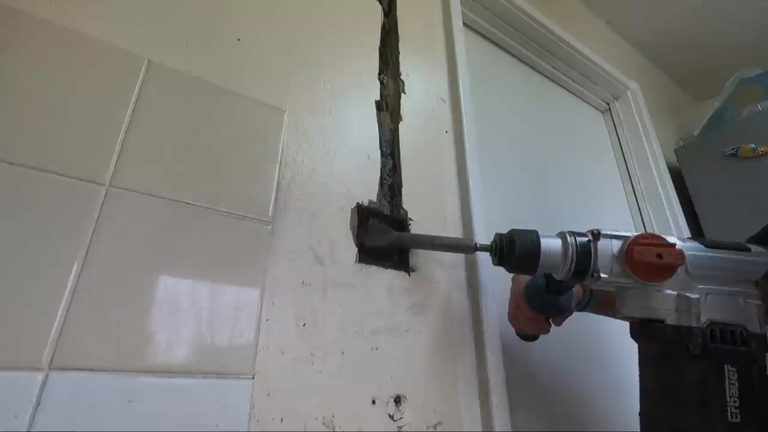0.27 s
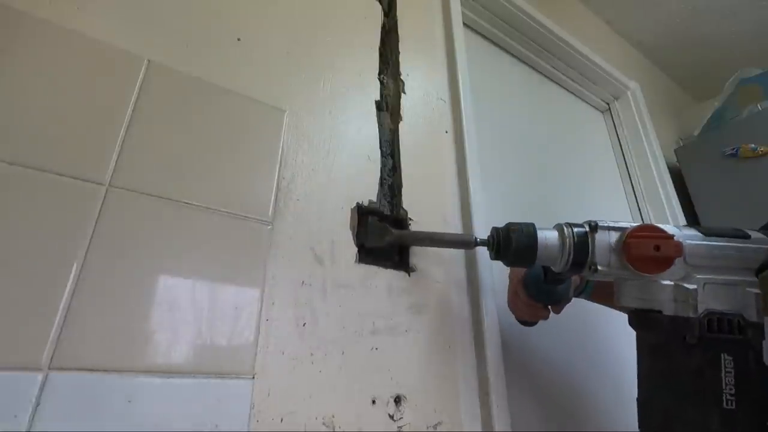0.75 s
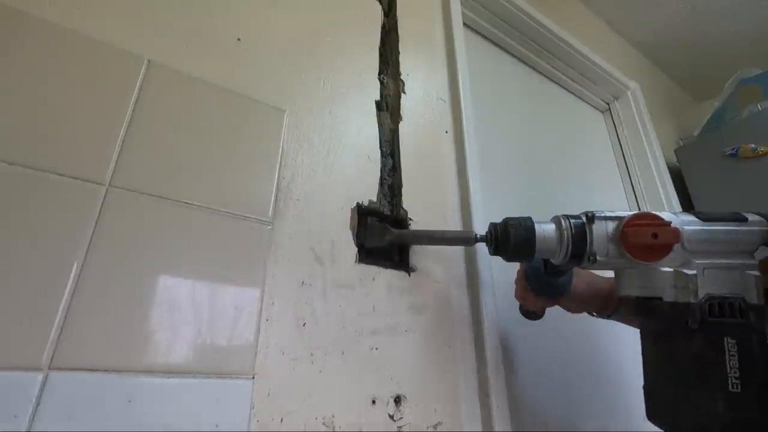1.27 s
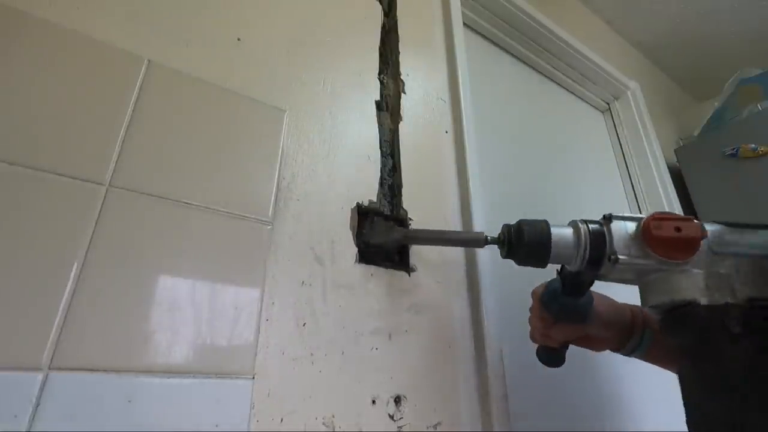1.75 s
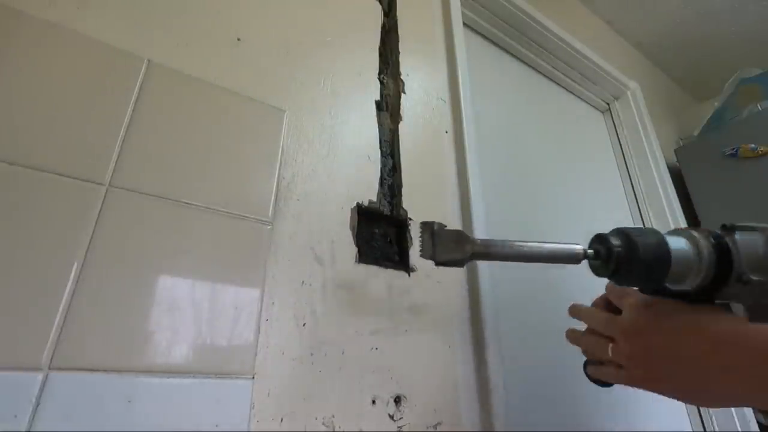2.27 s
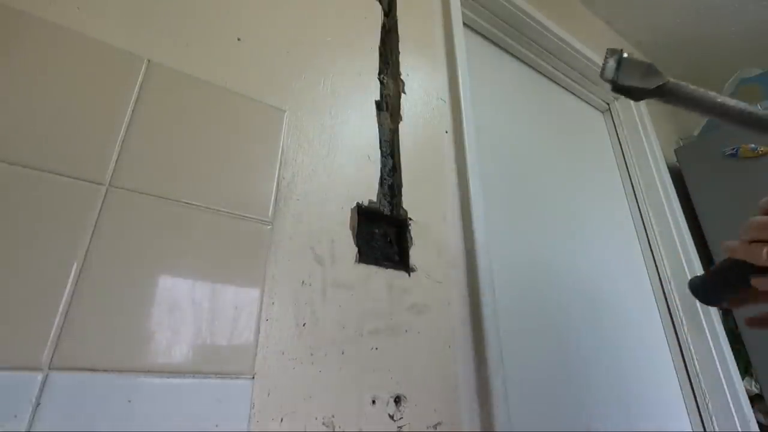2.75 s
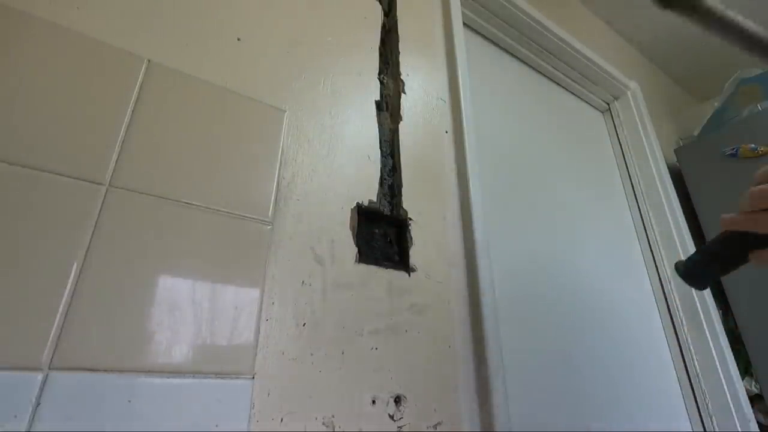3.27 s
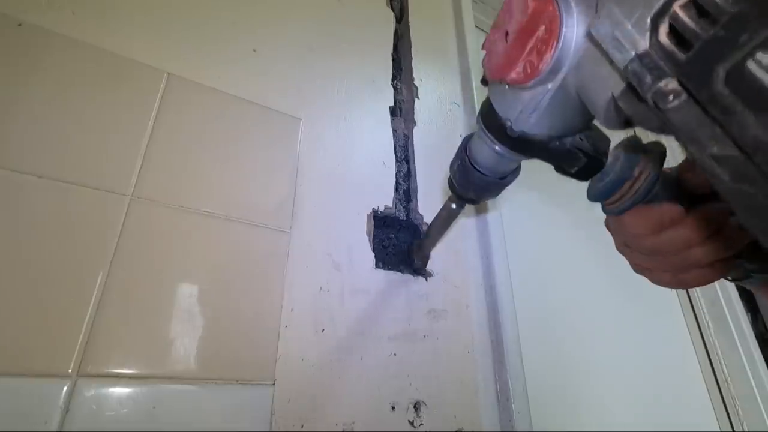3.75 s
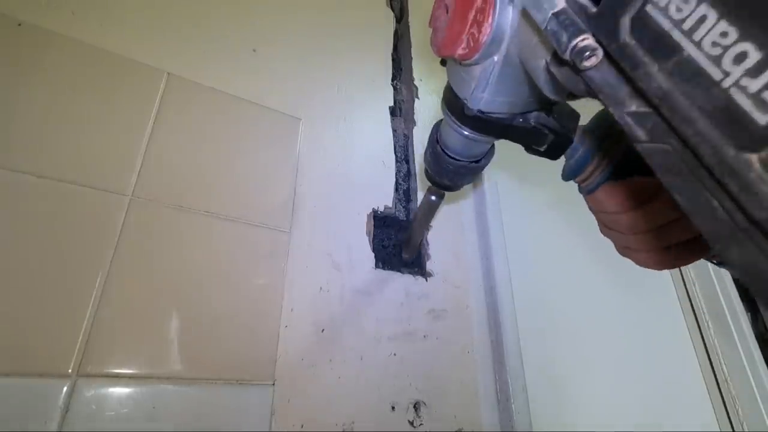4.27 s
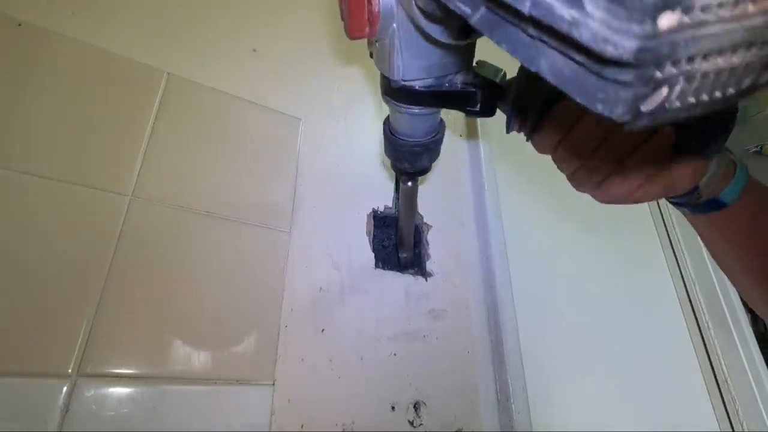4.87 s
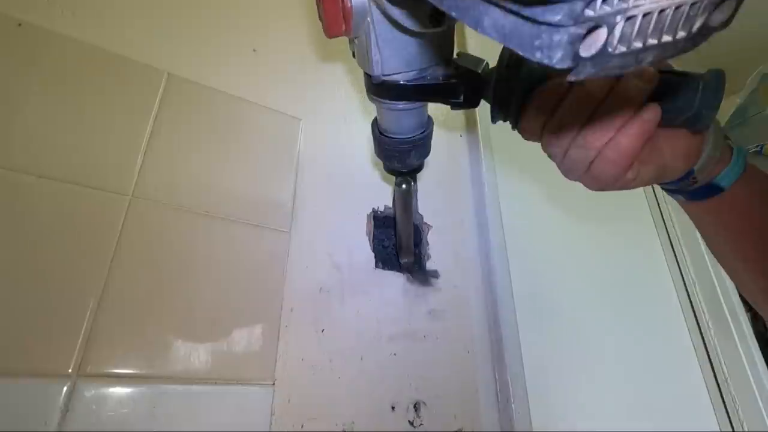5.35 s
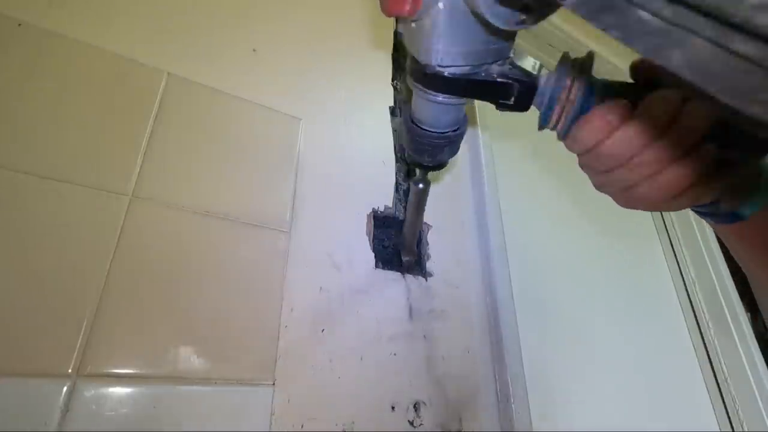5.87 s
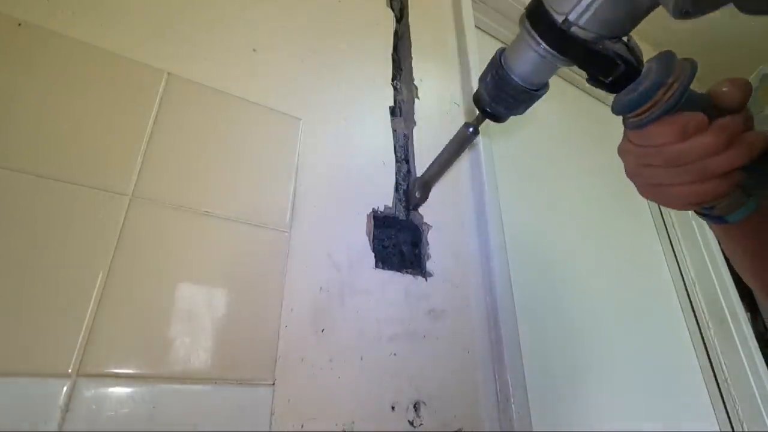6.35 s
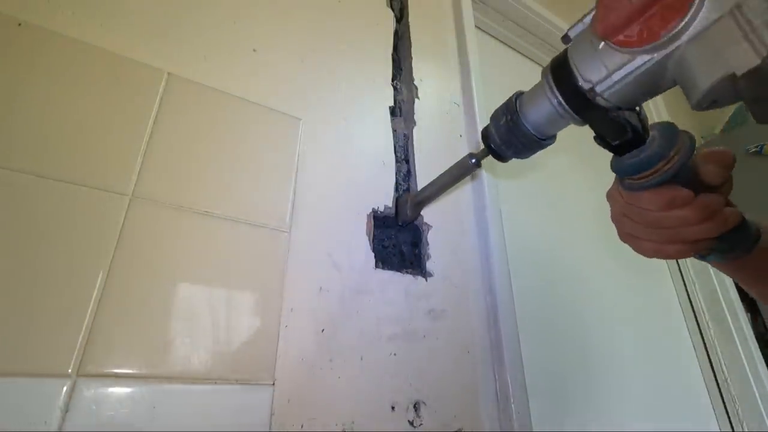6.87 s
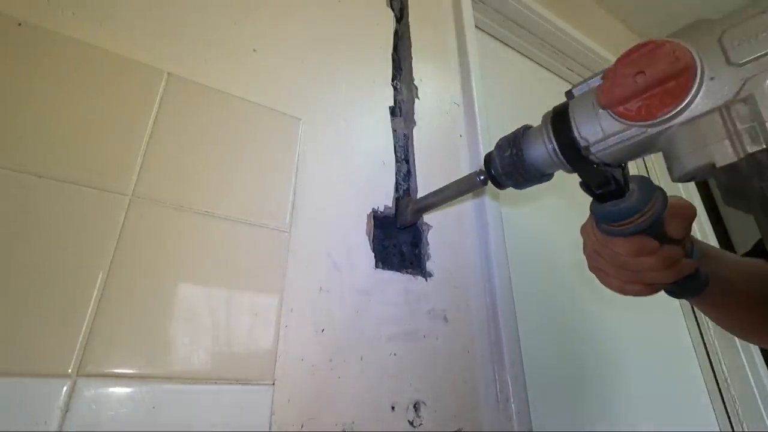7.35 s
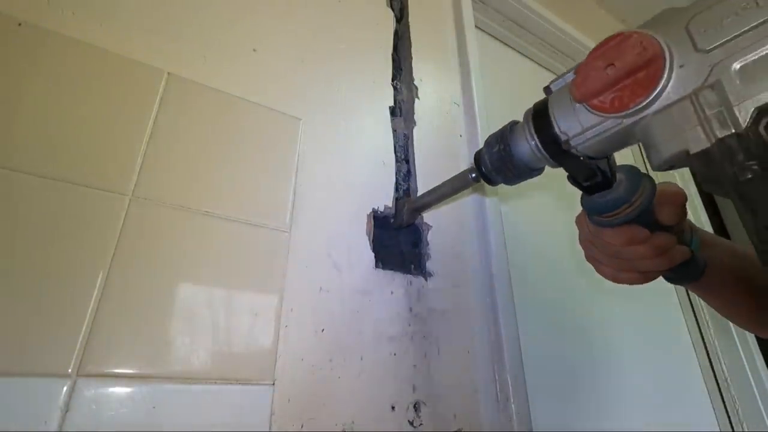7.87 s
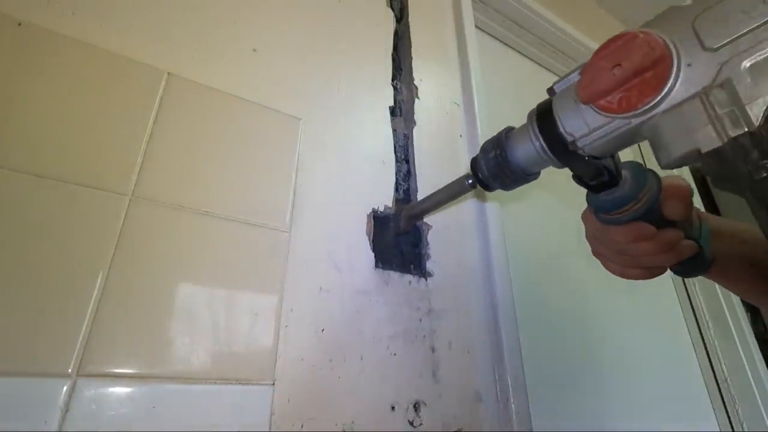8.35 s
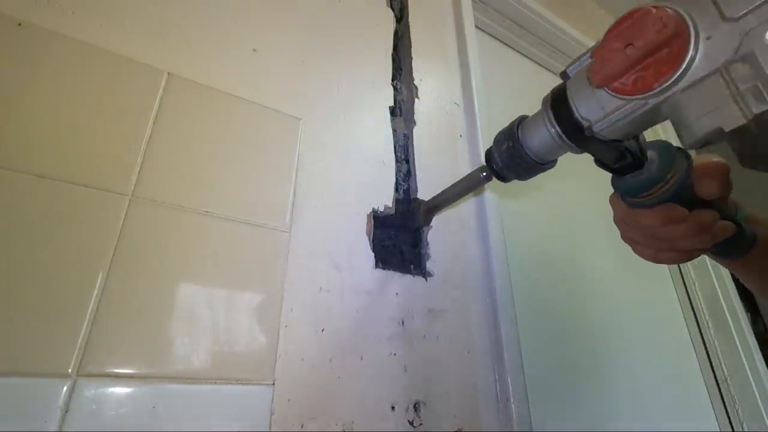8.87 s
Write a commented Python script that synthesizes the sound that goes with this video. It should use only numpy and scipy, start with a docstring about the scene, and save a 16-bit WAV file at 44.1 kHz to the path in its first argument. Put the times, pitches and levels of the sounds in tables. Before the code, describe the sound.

In a small tiled room, a hammer drill whirs at speed and chatters briefly against plaster, then winds down in a long falling whine. Clicks and dull bumps follow as the chisel is set again. More short bursts pound the wall with booming thuds, sharp cracks and steel ringing, each followed by a gritty coasting motor. The microphone is close, with short hard reflections.

```python
"""Hammer drill on a plaster wall

A hammer drill chisels a socket box out of a plaster wall in a small tiled room. Short trigger pulls whirl
the motor up: filtered noise makes its rush, rotor-locked sines its whine, and both fall as it coasts down.
Blows timed by the crank set off wall booms, plaster cracks and chisel rings. Between bursts the tool clicks,
bumps and rumbles as the chisel is set against the wall anew."""
import sys
import numpy as np
from scipy import signal
from scipy.fft import rfft, irfft, next_fast_len
from scipy.io import wavfile
from scipy.ndimage import uniform_filter1d

SR = 44100
rng = np.random.default_rng(int(sys.argv[2]) if len(sys.argv) > 2 else 0)


def write(x):
    x = np.atleast_2d(x).T
    wavfile.write(sys.argv[1], SR, np.round(np.clip(x, -1, 1) * 32767).astype(np.int16))


N = 401310
TIME = np.arange(N) / SR
FAN_CYCLES_PER_BLOW, FULL_SPEED_HZ = 52.5, 3240   # speed is given as the pitch of the fan tone

# bursts of blows, the chisel biting, or the idle piston knocking lightly in the weak rows at 0.2 s and 1 s:
# (first blow [s], end [s], thud at full speed [dB], crack [dB], chisel ring [dB], wall clack re thud [dB])
BLOW_BURSTS = [(0.014, 0.149, -20.5, -21, -25, -25), (0.2, 0.548, -37.5, -28, -31, 10),
               (1.023, 1.557, -29, -22.5, -28, 5), (3.784, 3.871, -14, -45, -29, -10),
               (3.877, 3.945, -8, -16.5, -18, -1), (5.323, 5.546, -14, -25.5, -28.5, 3),
               (5.674, 5.74, -15, -25, -41, 14), (5.739, 5.885, -14.5, -26, -21.5, 5.5),
               (7.386, 8.13, -16, -24, -26, 10.5), (8.104, 8.36, -19, -26.5, -26, 8),
               (8.398, 8.598, -19, -24.5, -32, 10), (9.069, 9.113, -15, -17.5, -32, -10)]
# trigger pulls: (on [s], off [s], fan tone reached at off [Hz], coasting time constant [s])
TRIGGER_PULLS = [(0, .017, 2948, 1.183), (.075, .232, 3917, 1.521), (.895, 1.119, 3830, 1.47),
                 (3.764, 3.892, 2885, 1.42), (5.298, 5.43, 2969, 1.36), (5.729, 5.84, 3350, 1.451),
                 (7.339, 7.509, 3319, 1.165), (8.077, 8.256, 3350, 1.234)]


def from_db(db):
    """Decibels to gain."""
    return 10 ** (np.asarray(db) / 20)


def rms_one(x):
    """Scale to unit rms."""
    return x / np.sqrt(np.mean(x ** 2) + 1e-20)


def unit_energy(x):
    """Scale a response to unit energy."""
    return x / np.sqrt(np.sum(x ** 2) + 1e-20)


def gain_at(points, hz):
    """Gain of a (frequency [Hz], level [dB]) table at given frequencies."""
    f, db = np.transpose(points)
    return from_db(np.interp(np.log(hz + 1), np.log(f), db))


def shaped(x, gain):
    """Filter by a gain that is a function of frequency."""
    size = next_fast_len(len(x))
    hz = np.arange(size // 2 + 1) * SR / size
    return irfft(rfft(x, size) * gain(hz), size)[:len(x)]


def butter(x, hz, kind):
    """Second-order Butterworth filter."""
    return signal.sosfilt(signal.butter(2, hz, kind, fs=SR, output="sos"), x)


def drift(rate_hz, step=16):
    """Slow random signal of unit rms, computed at every step-th sample."""
    white = rng.standard_normal(next_fast_len(N // step + 2))
    hz = np.fft.rfftfreq(len(white), step / SR)
    slow = irfft(rfft(white) / (1 + (hz / rate_hz) ** 2), len(white))
    return np.interp(np.arange(N) / step, np.arange(len(slow)), rms_one(slow))


def fade(t, t60_s):
    """Exponential decay by 60 dB in t60_s."""
    return np.exp(-np.log(1000) * t / t60_s)


def swell(start_s, end_s):
    """A rounded rise and fall, 0-1."""
    return np.sin(np.pi * np.clip((TIME - start_s) / (end_s - start_s), 0, 1))


def taps(rows):
    """A click for each (time [s], level [dB]) row."""
    clicks = np.zeros(N)
    for s, db in rows:
        clicks[int(s * SR)] = from_db(db)
    return clicks


def play(clicks, response):
    """Every click sets off the response."""
    return signal.oaconvolve(clicks, response)[:N]


def motor_speed(start_hz=2900, spin_up_s=.07, friction_hz=1280):
    """Each pull whirls the motor up; then air drag and a steady friction run it down."""
    fan_hz = np.full(N, float(start_hz))
    for on, off, top_hz, coast_s in TRIGGER_PULLS:
        from_hz = np.interp(on, TIME, fan_hz)
        t = TIME[TIME >= on]
        rise = np.expm1(-(t - on) / spin_up_s) / np.expm1(-(off - on) / spin_up_s)
        driven = from_hz + (top_hz - from_hz) * rise
        coast = (top_hz + friction_hz) * np.exp(-(t - off) / coast_s) - friction_hz
        fan_hz[TIME >= on] = np.where(t < off, driven, np.maximum(coast, 0))
    return fan_hz


def torque(fan_hz, lag_s=0.026):
    """How hard the motor pulls, 0-1: it follows the acceleration with a lag."""
    r = np.exp(-1 / (lag_s * SR))
    pull = signal.lfilter([1 - r], [1, -r], np.maximum(np.gradient(fan_hz), 0) + 1e-18)
    return pull / pull.max()


def per_pull():
    """The levels of the latest pull at every sample, changing smoothly."""
    # one row per pull: (rush [dB], roar [dB], hiss [dB], starting growl [dB], fan tone [dB], overtones [dB])
    pull_levels = [(-2, -5, 1.5, -34, -38, -53), (0.5, -1, -1, -33, -40, -30),
                   (0.5, 0, -1, -35, -28.5, -28.5), (2, 4, 3, -13.5, -25.5, -27),
                   (1, 3, 0, -12.5, -43, -45), (1, 2.5, 0.5, -24, -31, -37),
                   (-1.5, -4.5, 2, -12.5, -43, -45), (-1.5, 1.5, 2.5, -29, -37, -55)]
    latest = np.maximum(np.searchsorted(np.array(TRIGGER_PULLS)[:, 0], TIME, "right") - 1, 0)
    return uniform_filter1d(np.array(pull_levels, float)[latest].T, size=600)


def by_speed(fan_hz):
    """Level, roar and hiss of the rush of fan and gears at the current speed."""
    # (fan tone [Hz], level [dB], relative roar before trim [dB], relative hiss before trim [dB])
    speed_levels = [(0, -46, -13, -7), (90, -42, -12, -15), (300, -32.5, -16, -13), (530, -25, -17.5, -9.5),
                    (900, -21.5, -12.5, -8), (1280, -20, -10, -6.5), (2190, -16, -11, -8.5),
                    (3040, -14, -9.5, -7.5), (3930, -10, -15.5, -7)]
    hz, *columns = np.transpose(speed_levels)
    return [np.interp(fan_hz, hz, c) for c in columns]


def poses():
    """Share of each way of holding the tool, over time."""
    # the tool is turned at these times [s]
    turns_s = [3.9, 6.75]
    first, second = [np.clip((TIME - s) / 0.2 + .5, 0, 1) for s in turns_s]
    return np.array([1 - first, first - second, second])


def housing(hz, pose, depth):
    """Gain of the tool's body and vents; depth scales the resonance peaks in dB."""
    # broad colour of the rush: (frequency [Hz], relative density [dB per Hz])
    rush_colour = [(30, -50), (70, -27), (140, -21), (280, -8), (420, -6.5), (650, -7), (900, -3),
                   (1500, -1), (2300, -3), (3200, 1), (4300, -5), (6800, -13.5), (8400, -24), (12000, -27)]
    # resonances at depth 1: (frequency [Hz], width [Hz], held level [dB], held close [dB], held askew [dB])
    resonances = [(650, 184, 8, 9.5, 12), (1085, 170, 4, 4, 7), (1204, 360, -2, 0, -6),
                  (1535, 39, -4, 3.5, 3.5), (1850, 68, -2, -5, -4.5), (2163, 117, 4, 7, 4),
                  (2420, 216, 3, 8.5, 3.5), (2800, 260, 1, 3, 5.5), (4030, 170, -2.5, 2, -3.5),
                  (5240, 490, 1.5, 2.5, 1)]
    peaks_db = sum(dbs[pose] / (1 + (2 * (hz - centre) / width) ** 2)
                   for centre, width, *dbs in resonances)
    return gain_at(rush_colour, hz) * from_db(depth * peaks_db)


def rush(fan_hz, crank, roar_db, hiss_db, grit_db=1.5, throb=0.021, roar_trim_db=8.0, hiss_trim_db=10.0,
         fast_depth=0.94, slow_depth=1.49):
    """Gritty air and gear noise throbs with the crank; housing resonances stand out as it slows."""
    # brushes and bearings scrape the same way on each turn of the rotor: a comb of faint gliding lines
    rotor = np.cumsum(fan_hz) / SR / 12
    surface = rng.standard_normal(200)
    scrape = np.interp(rotor % 1, np.linspace(0, 1, 200), surface) * np.minimum(fan_hz / 900, 1)
    teeth = rng.standard_normal(N) * from_db(grit_db * drift(350)) + .3 * scrape
    fast = np.minimum(fan_hz / FULL_SPEED_HZ, 1)
    noise = np.zeros(N)
    for pose, share in enumerate(poses()):
        for blend, depth in ((fast, fast_depth), (1 - fast, slow_depth)):
            noise += share * blend * rms_one(shaped(teeth, lambda f: housing(f, pose, depth)))
    roar = shaped(noise, lambda f: 1 / (1 + (f / 1150) ** 4))
    hiss = shaped(noise, lambda f: 1 - 1 / (1 + (f / 4600) ** 8))
    middle = noise - roar - hiss
    mix = middle + roar * from_db(roar_db + roar_trim_db) + hiss * from_db(hiss_db + hiss_trim_db)
    return mix * (1 + throb * np.cos(2 * np.pi * crank))


def whine(fan_hz, effort, fan_db, overtones_db, wobble=0.0059, strain=0.02484, driven_db=15, flutter_db=3.5,
          fade_db_per_octave=11.0):
    """Rotor-locked tones: loud and rough while the motor pulls, fading as it slows, swelling at times."""
    # (multiple of the fan tone, level re overtone level [dB])
    overtones = [(2, 7), (2.501, -21), (2.95, -0.5)]
    # how well the housing gives off a tone: (frequency [Hz], gain [dB])
    whine_colour = [(400, -22), (1200, -15), (1900, 4.5), (3300, 1.5), (4800, -3.5), (6500, -10),
                    (8000, -19), (11000, -26)]
    # brief swells: (middle [s], length [s], multiple of the fan tone, top level [dB])
    whine_swells = [(0.385, 0.63, 1, -23.5), (1.28, 0.21, 2, -34), (1.816, .2, 1, -35),
                    (4.11, 0.23, 2, -28), (4.19, 0.17, 1, -34), (4.537, 0.16, 2.95, -26),
                    (5.67, 0.16, 1, -26), (5.9, .14, 1, -24), (6.184, .14, 2, -22.5), (8.7, 0.34, 2, -31)]
    unsteady_hz = fan_hz * (1 + (wobble + strain * effort) * drift(150.4))
    phase = 2 * np.pi * np.cumsum(unsteady_hz) / SR
    speed_db = fade_db_per_octave * np.log2((fan_hz + 1) / FULL_SPEED_HZ)
    tones = [(1, fan_db + driven_db * effort)] + [(k, overtones_db + db) for k, db in overtones]
    out = np.zeros(N)
    for k, db in tones:
        steady = from_db(db + speed_db) * gain_at(whine_colour, k * fan_hz)
        swells = sum(from_db(top_db) * swell(s - length / 2, s + length / 2)
                     for s, length, multiple, top_db in whine_swells if abs(multiple - k) < .2)
        out += np.hypot(steady, swells) * from_db(flutter_db * drift(45)) * np.sin(k * phase)
    return np.sqrt(2) * out


def buzzes():
    """Vibration rattles loose parts as the motor runs down; each rings at its own resonance."""
    # (start [s], end [s], resonance [Hz], width [Hz], top level [dB])
    loose_parts = [(1.5, 2.6, 685, 70, -31.5), (2.25, 3.054, 1470, 100, -35.5),
                   (4.448, 5.28, 2380, 160, -27.5), (6.04, 7.139, 4880, 440, -25.5),
                   (6.3, 7.3, 2700, 160, -36)]
    out, rattle = np.zeros(N), rng.standard_normal(N)
    for start, end, hz, width_hz, db in loose_parts:
        ring = rms_one(signal.lfilter(*signal.iirpeak(hz, hz / width_hz, fs=SR), rattle))
        out += from_db(db) * swell(start, end) * ring
    return out


def draught(fan_hz, db_at_3000_hz=-44.5, corner_hz=260):
    """The cooling air buffets the microphone, growing with the square of the fan speed."""
    buffet = rms_one(butter(butter(rng.standard_normal(N), corner_hz, "low"), 100, "high"))
    return from_db(db_at_3000_hz) * (fan_hz / 3000) ** 2 * buffet


def blows(fan_hz, crank, uneven_db=3.0, thud_db_per_octave=8.5, seat_s=0.027, seat_db=-3, ease_s=0.12,
          ease_db=-7):
    """One blow per crank turn during each burst, thud and clack heavier at speed: thud, crack, ring, clack
    trains."""
    trains = np.zeros((4, N))
    for start, end, thud_db, crack_db, ring_db, clack_db in BLOW_BURSTS:
        turns = crank - np.interp(start, TIME, crank)
        at = np.searchsorted(turns, np.arange(np.interp(end, TIME, turns)))
        period_s = FAN_CYCLES_PER_BLOW / fan_hz[at]
        # weaker until the chisel is seated, and again as the push is eased
        seating_db = seat_db * np.clip(1 - (TIME[at] - start) / seat_s, 0, 1)
        easing_db = ease_db * np.clip(1 - (end - TIME[at]) / ease_s, 0, 1)
        speed_db = thud_db_per_octave * np.log2(fan_hz[at] / FULL_SPEED_HZ)
        force_db = thud_db + seating_db + easing_db + speed_db
        levels_db = (force_db, crack_db, ring_db, force_db + clack_db)
        chance_db = rng.normal(0, uneven_db, (len(at), 4)) * [.4, 1, 2, .4]
        for train, db, luck_db in zip(trains, levels_db, chance_db.T):
            train[at] = np.sqrt(period_s) * from_db(db + luck_db)
    return trains


def wall_response(travel_s=0.005488, size=8192):
    """Bending waves travel with the root of frequency, so a blow arrives as a short falling chirp."""
    # (frequency [Hz], relative level [dB])
    wall_colour = [(30, -49), (60, -59), (100, -53), (130, 2.5), (190, 1.5), (250, -2), (320, -0.5),
                   (420, 3.5), (520, -28.5), (680, -8.5), (880, -25), (1200, -7), (1550, -33.5),
                   (3000, -31)]
    hz = np.arange(size // 2 + 1) * SR / size
    delay_s = travel_s * np.maximum(np.sqrt(1000 / (hz + 20)) - .72, 0)
    phase = 2 * np.pi * np.cumsum(delay_s) * SR / size
    return unit_energy(irfft(gain_at(wall_colour, hz) * np.exp(-1j * phase))[:size // 2])


def wall(thuds, clacks, bump_db=19.0, sway_db=-16.0, sway_hz=55, sway_t60_s=0.079):
    """Blows make the wall boom and ring, and clack where the edge meets solid masonry; bumps also sway it."""
    # the tool's weight bumping the wall: (time [s], level before bump_db is added [dB])
    weight_bumps = [(2.77, -48), (3.504, -28.5), (3.538, -28), (3.574, -26.5), (3.601, -35), (3.739, -28),
                    (5.158, -30), (5.193, -37), (6.76, -29), (7.251, -30), (7.313, -22), (8.972, -22)]
    # panel modes: (frequency [Hz], relative level [dB], t60 [s])
    panel_modes = [(142, -33, 0.14), (185, 8.5, 0.2), (307.4, 21, 0.04), (424, 1, 0.1)]
    bumps = from_db(bump_db) * taps(weight_bumps)
    response = wall_response()
    boom = shaped(response, lambda f: 1 / (1 + (f / 560) ** 6))
    clack = response - boom
    t = np.maximum(TIME[:len(response)] - .008, 0)   # the panel rings once the slow wave has arrived
    panel = unit_energy(sum(from_db(db) * fade(t, t60) * np.sin(2 * np.pi * hz * t)
                            for hz, db, t60 in panel_modes))
    swing = fade(t, sway_t60_s) * np.cos(2 * np.pi * sway_hz * t) * (1 - fade(t, .02))
    sway = from_db(sway_db) * unit_energy(swing)
    struck = play(thuds + bumps, boom + np.sqrt(.5) * panel) + play(clacks + bumps / 2, clack)
    return butter(struck, 90, "high") + play(bumps, sway)


def chisel(cracks, rings):
    """Plaster snaps and crumbles under the edge as noise bursts while the steel rings in decaying modes."""
    # (frequency [Hz], relative level [dB])
    crack_colour = [(200, -71), (800, -2.5), (1800, -6), (3200, 1), (4500, -0.5), (6500, -6.5),
                    (8500, -12.5), (12000, -15.5)]
    # steel modes: (frequency [Hz], relative level [dB], t60 [s])
    steel_modes = [(2940, 13, 0.011), (3277, 15, 0.024), (3380, -15, 0.03), (3850, 5.5, 0.017),
                   (6000, 2.5, 0.024), (8100, -12, .03)]
    # tip set down on the masonry: (time [s], ring level [dB])
    tip_taps = [(3.258, -23), (3.504, -16), (3.57, -5)]
    t = TIME[:SR // 6]
    burst = unit_energy(fade(t, .022) + from_db(-17) * fade(t, .05))
    envelope = np.sqrt(np.abs(play(cracks ** 2, burst ** 2)))   # bursts add in power
    crack = envelope * rms_one(shaped(rng.standard_normal(N), lambda f: gain_at(crack_colour, f)))
    steel = sum(from_db(db) * fade(t, t60) * np.sin(2 * np.pi * hz * t) for hz, db, t60 in steel_modes)
    return crack + play(rings + taps(tip_taps), unit_energy(steel))


def knocks(tick_db=-10, body_db=-5.5):
    """Trigger clicks and the chisel being set down: a noise tick and a short rattle of the housing."""
    # (time [s], level of the noise before its envelope [dB], brightness tilt at 4 kHz [dB], rattle t60 [s])
    knock_rows = [(3.084, -32.5, 23, 0.065), (3.099, -32, 18, 0.064), (3.258, -23.5, -10, 0.077),
                  (3.503, -27.5, 31, 0.33), (3.535, -28, -7, 0.14), (3.569, -24, -6, 0.062),
                  (3.684, -42, 9, .03), (3.727, -22.5, -20, 0.1), (3.765, -1, -20, 0.015),
                  (5.15, -17, 12, 0.043), (5.295, -11, 0, 0.021), (7.312, -11.5, -16, 0.026)]
    # (frequency [Hz], relative level [dB])
    knock_colour = [(100, -16), (500, -13.5), (1200, -1.5), (2100, 7.5), (3300, 3), (5000, -6.5),
                    (8000, -24), (12000, -38)]
    out, t = np.zeros(N), TIME[:SR // 4]
    tick = from_db(tick_db) * fade(t, .008)
    for s, db, bright_db, t60 in knock_rows:
        noise = shaped(rng.standard_normal(len(t)),
                       lambda f: gain_at(knock_colour, f) * from_db(bright_db * f / (f + 4000) * 2))
        envelope = tick + from_db(body_db) * fade(t, t60)
        out[int(s * SR):][:len(t)] += from_db(db) * rms_one(noise) * envelope
    return out


def handling(low_hz=45, high_hz=95):
    """Hands shift their grip and the heavy tool gives a dull rumble: swelling low-passed noise."""
    # (start [s], end [s], top level [dB])
    shifts = [(2.72, 2.86, -51), (3.39, 3.8, -43), (3.8, 4.15, -37), (4.35, 4.8, -47)]
    rumble = rms_one(butter(butter(rng.standard_normal(N), high_hz, "low"), low_hz, "high"))
    return rumble * sum(from_db(db) * swell(start, end) for start, end, db in shifts)


def room(x, wet_db, t60_s=0.27):
    """Dense reflections off tiles and door: decaying noise as an echo response."""
    t = TIME[:SR // 2]
    tail = rng.standard_normal(len(t)) * fade(t, t60_s) * (t > .005)
    return x + from_db(wet_db) * play(x, unit_energy(butter(tail, 13200, "low")))


def ambience(level_db=-47.5):
    """Steady background noise with a fixed spectrum."""
    # (frequency [Hz], relative density [dB per Hz])
    ambience_colour = [(25, 1), (70, -6), (130, -1.5), (300, 5.5), (600, 5), (1500, 0), (2500, -23),
                       (4400, -5), (8000, -18), (12000, -26)]
    noise = shaped(rng.standard_normal(N), lambda f: gain_at(ambience_colour, f))
    return from_db(level_db) * rms_one(noise)


def widen(mid):
    """Scattered sound, added left and subtracted right, sets the ears apart mostly in the top treble."""
    # (frequency [Hz], side re mid [dB])
    side_levels = [(60, -37), (91, -22), (140, -51), (210, -54), (310, -62), (470, -37), (710, -48),
                   (1070, -52), (1620, -57), (2450, -70), (3700, -63), (5590, -47), (8440, -33.5),
                   (12700, -2.5)]
    scatter = unit_energy(rng.standard_normal(size=1500) * fade(TIME[:1500], .08))
    side = shaped(play(mid, scatter), lambda f: gain_at(side_levels, f))
    return np.array([mid + side, mid - side])


def scene(bite_db=-3.5, bite_roar_db=1.0, growl_dulls_db=-2):
    """The drill close by, its blows echoing in the room, over a faint background."""
    fan_hz = motor_speed()
    crank = np.cumsum(fan_hz) / SR / FAN_CYCLES_PER_BLOW
    level_db, roar_db, hiss_db = by_speed(fan_hz)
    pull_db, pull_roar_db, pull_hiss_db, growl_db, fan_db, overtones_db = per_pull()
    effort = torque(fan_hz)
    # the motor's rush is somewhat quieter throughout every burst of blows, light or hard
    in_bite = sum(((TIME > start) & (TIME < end)).astype(float) for start, end, *_ in BLOW_BURSTS)
    biting = uniform_filter1d(in_bite, size=900)
    level = np.hypot(from_db(level_db + pull_db + bite_db * biting), from_db(growl_db) * effort)
    roar_db = roar_db + pull_roar_db + bite_roar_db * biting
    hiss_db = hiss_db + pull_hiss_db + growl_dulls_db * effort   # duller while the motor labours
    air = level * rush(fan_hz, crank, roar_db, hiss_db)
    tones = whine(fan_hz, effort, fan_db, overtones_db)
    motor = room(air + buzzes() + tones, wet_db=-14.5) + draught(fan_hz)
    thuds, cracks, rings, clacks = blows(fan_hz, crank) * np.sqrt(SR)
    impacts = room(wall(thuds, clacks), wet_db=-7.0) + room(chisel(cracks, rings) + knocks(), wet_db=-9.0)
    return widen(motor + impacts + handling() + ambience())


def gain_control(x, limit_db=-9.5, recovery_db_per_s=25.0):
    """Heavy blows push the gain down; it creeps back afterwards."""
    level_db = 10 * np.log10(np.abs(uniform_filter1d(x[0] ** 2, size=500)) + 1e-12)
    climb_db = recovery_db_per_s * TIME
    cut_db = np.maximum.accumulate(np.maximum(level_db - limit_db, 0) + climb_db) - climb_db
    return x * from_db(-uniform_filter1d(cut_db, size=200))


def record(dry, notch_hz=9080, notch_q=10.7, low_cut_hz=40, cutoff_hz=12500):
    """The gain ducks and peaks are rounded; the microphone has a narrow dip, no deep bass and a cut top."""
    rounded = .8 * np.tanh(butter(gain_control(dry), low_cut_hz, "high") / .8)
    dipped = signal.lfilter(*signal.iirnotch(notch_hz, notch_q, fs=SR), rounded)
    return signal.sosfilt(signal.butter(14, cutoff_hz, fs=SR, output="sos"), dipped)


dry = scene()
out = record(dry)
write(out)
```